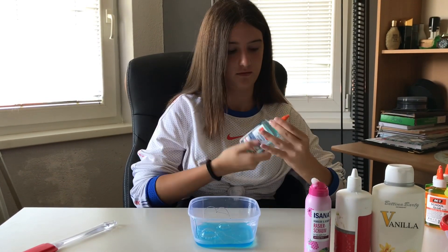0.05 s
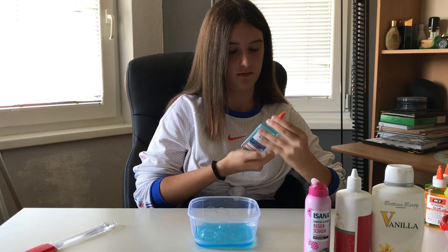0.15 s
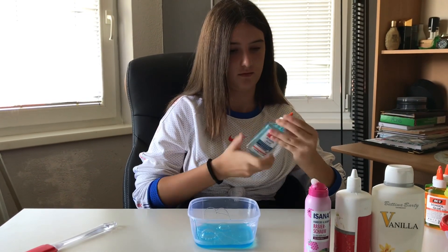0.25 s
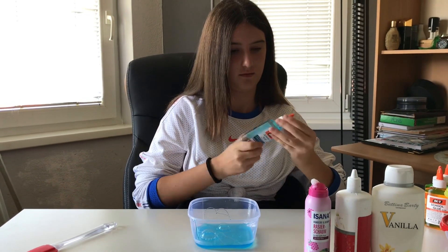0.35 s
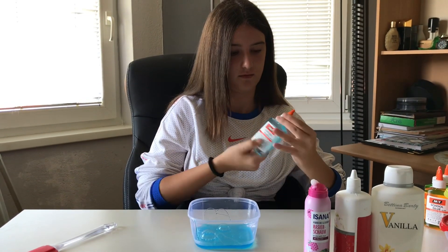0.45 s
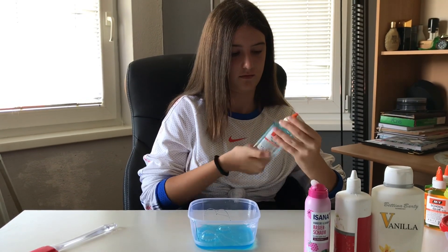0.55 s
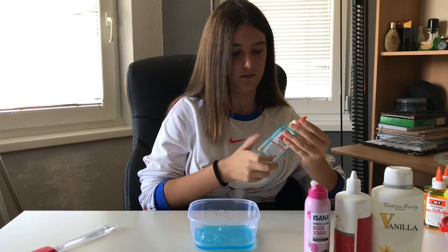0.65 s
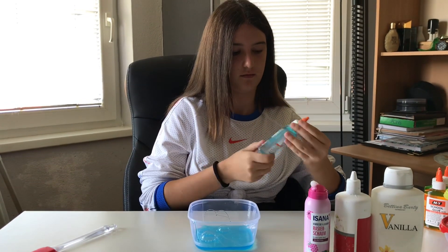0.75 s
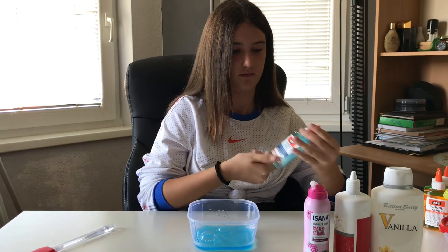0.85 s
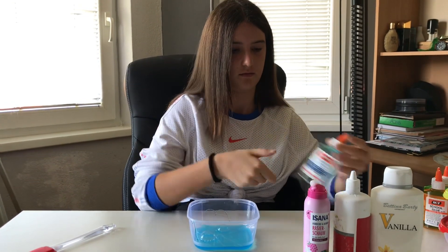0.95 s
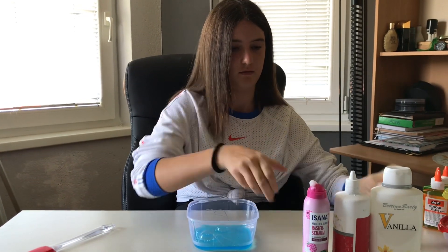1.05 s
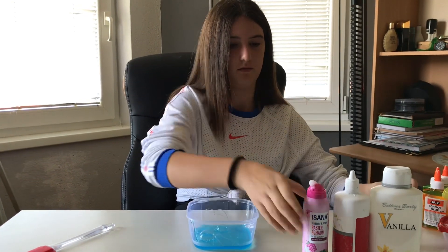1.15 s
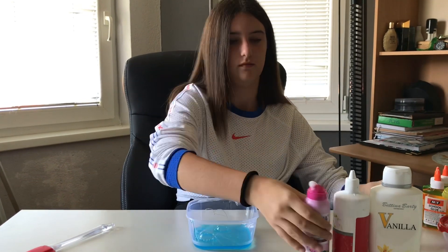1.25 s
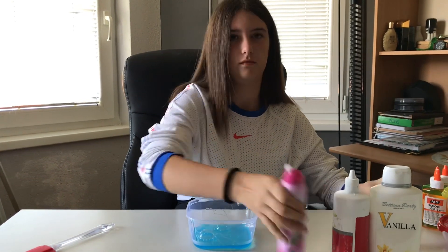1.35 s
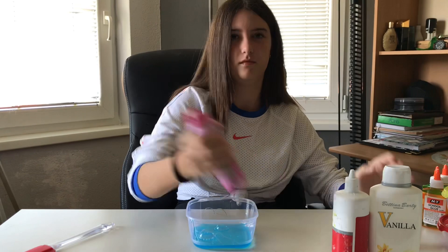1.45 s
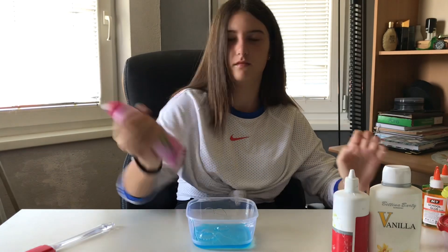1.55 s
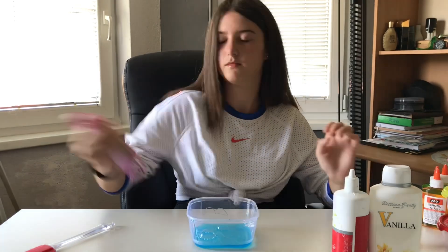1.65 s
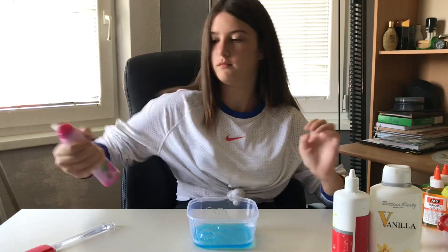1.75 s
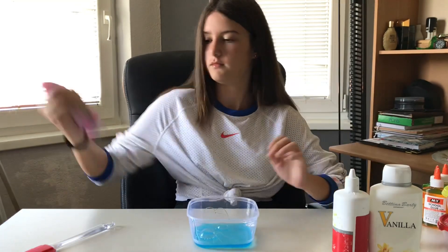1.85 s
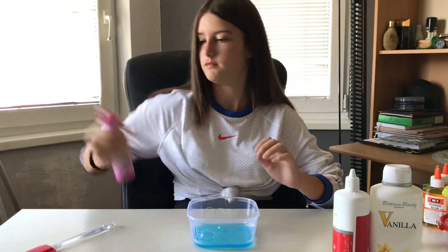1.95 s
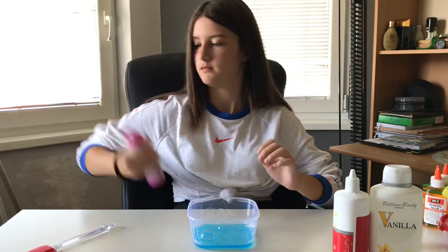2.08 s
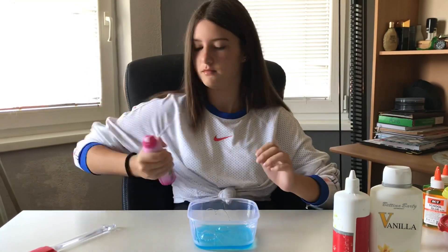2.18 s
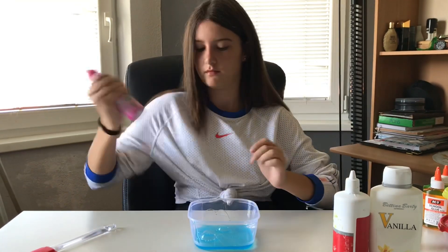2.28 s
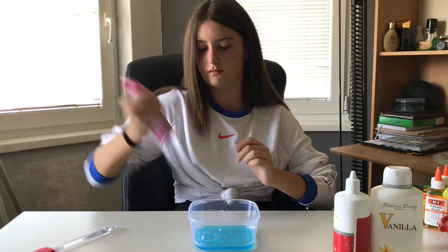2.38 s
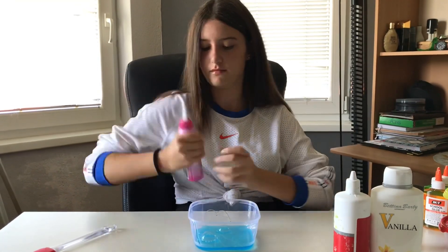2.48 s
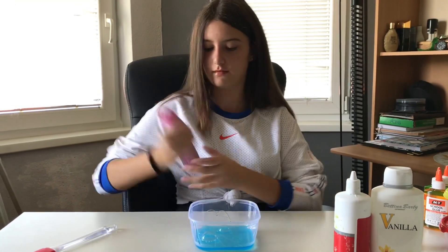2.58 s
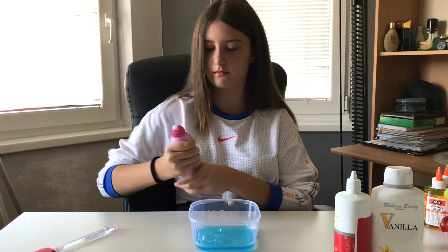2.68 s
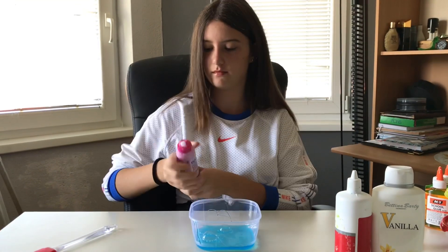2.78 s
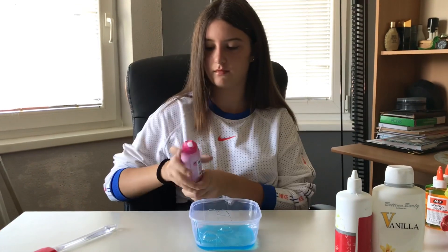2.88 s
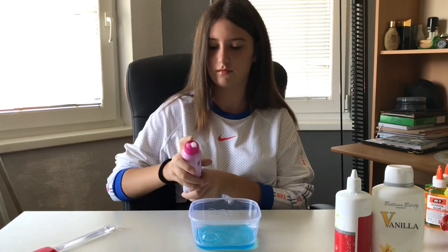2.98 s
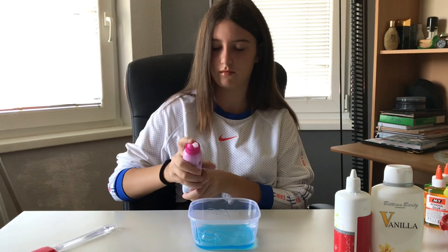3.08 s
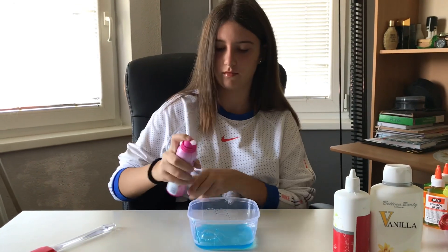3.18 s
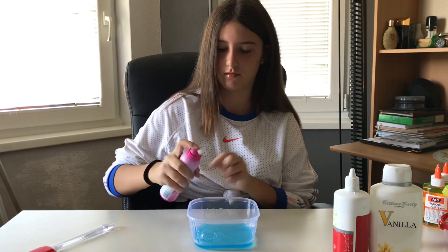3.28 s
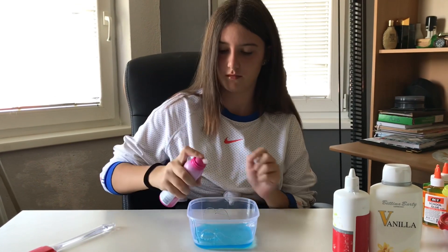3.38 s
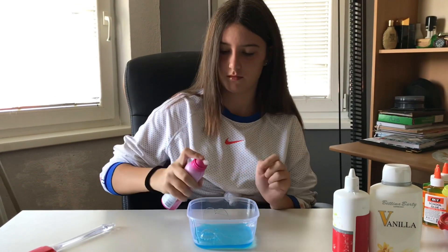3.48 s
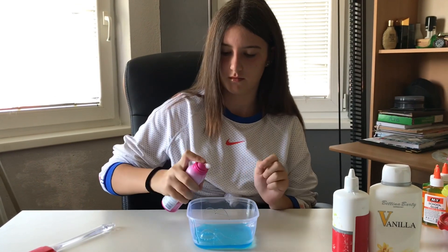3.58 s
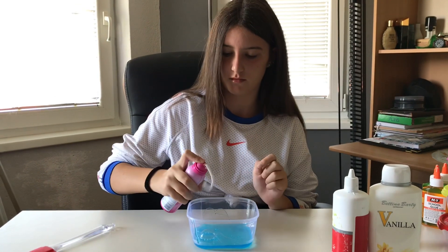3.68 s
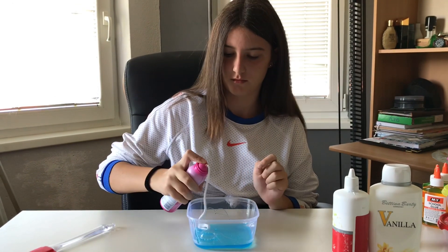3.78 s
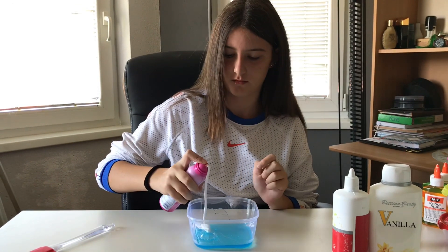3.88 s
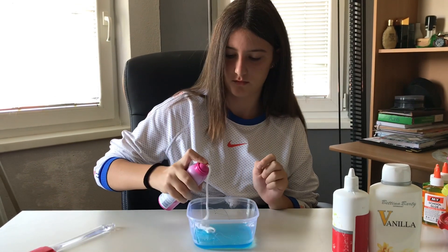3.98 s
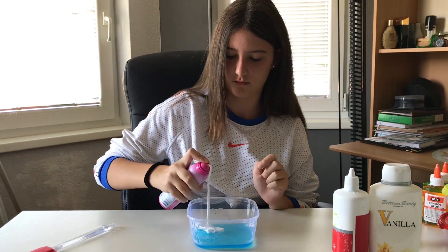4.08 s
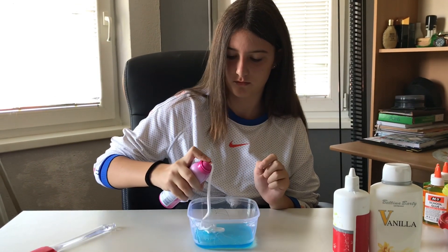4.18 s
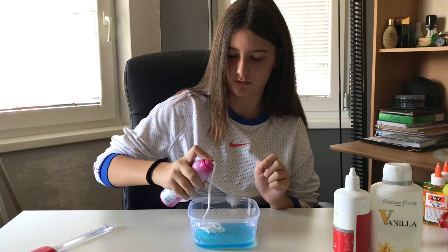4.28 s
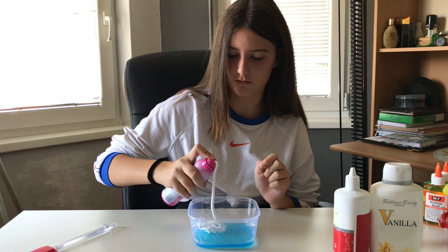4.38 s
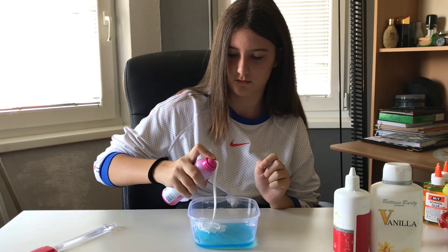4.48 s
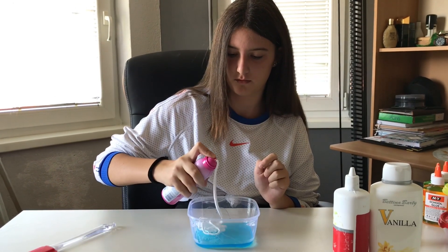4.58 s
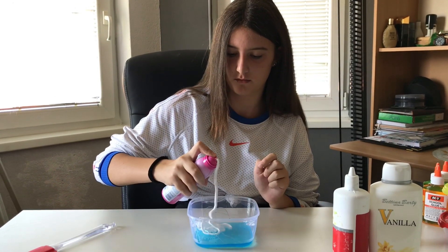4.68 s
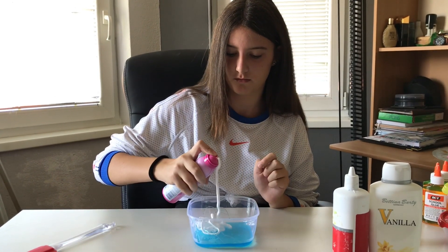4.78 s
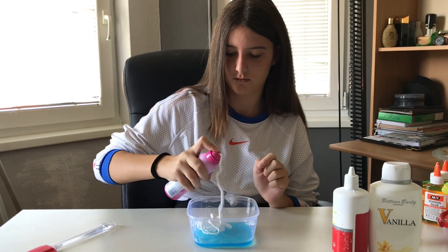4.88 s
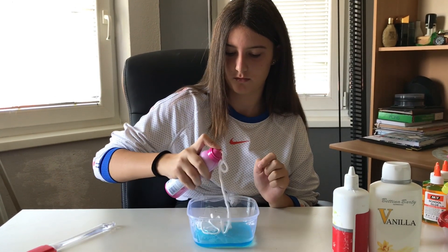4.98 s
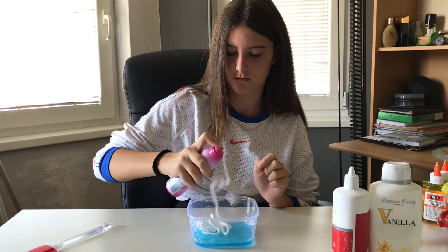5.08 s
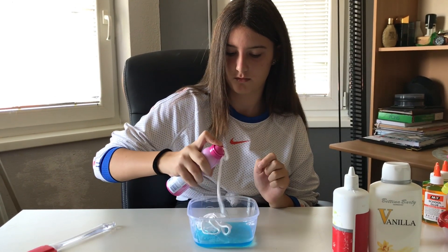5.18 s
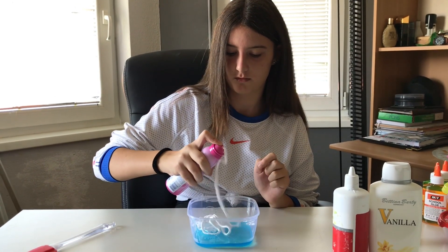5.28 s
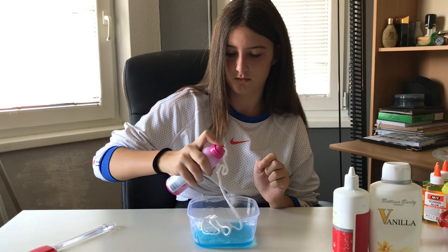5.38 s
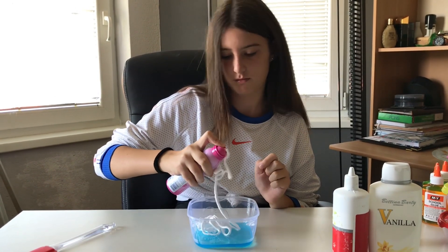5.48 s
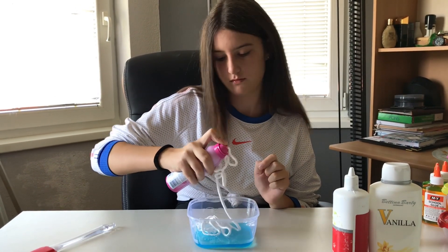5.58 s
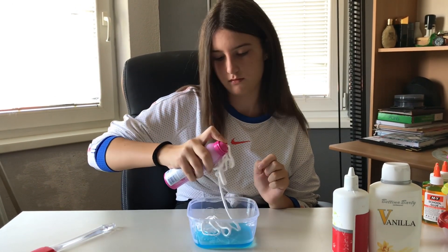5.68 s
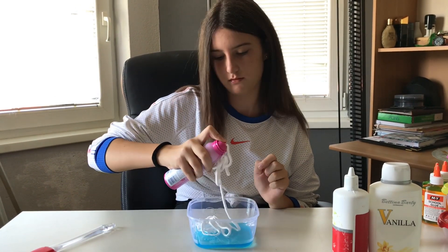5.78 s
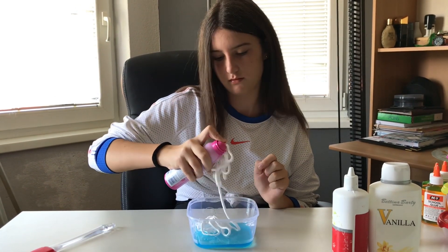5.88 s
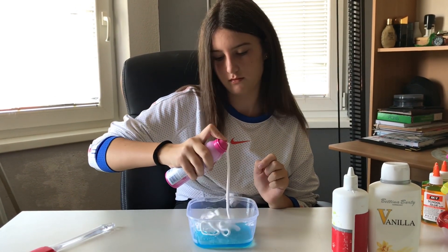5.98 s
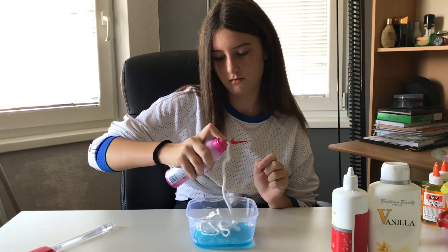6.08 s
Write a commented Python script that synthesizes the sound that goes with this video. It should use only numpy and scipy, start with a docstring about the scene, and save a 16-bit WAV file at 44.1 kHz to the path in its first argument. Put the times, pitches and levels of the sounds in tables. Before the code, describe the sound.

A plastic bottle is handled near the microphone in a small, quiet room, with a click at the start and faint finger taps through the first second. It knocks sharply on a table at about 1.2 and 1.3 seconds, rocks briefly, then lands with the loudest, hollow knock at 1.7 seconds. It wobbles in quickening, fading taps until 2.3 seconds. Overlapping this, a can of foam is shaken in rapid, soft liquid swishes until about 2.8 seconds, with faint sleeve rustling that carries into a short lull. At 3.6 seconds the valve spits a brief high hiss with tiny clicks and a wet sputter. It clicks open at 4.1 seconds, and foam runs out in a quiet, steady, airy hiss. From 5 seconds, tiny crackles and bubble pops join the hiss, which continues to the end at about 6 seconds.

```python
"""Plastic bottle and can of foam

In a small quiet room a plastic bottle is handled, knocked down on a table and left wobbling:
each impact excites the damped modes of bottle wall and table top. A can of foam is shaken, its
liquid swishing at every stroke. The valve spits, dribbles and clicks open; then turbulent gas
and tiny bursting bubbles drive the resonances of the spout as a string of foam hisses out."""
import sys
import numpy as np
from scipy import signal
from scipy.fft import rfft, irfft
from scipy.io import wavfile

SR = 44100
rng = np.random.default_rng(int(sys.argv[2]) if len(sys.argv) > 2 else 0)


def to_wav(sig):
    """Store sig (one row per channel, or 1-D mono) as 16-bit WAV at the path in sys.argv[1].

    Samples outside -1..1 are clipped; the rate is SR.
    """
    pcm = np.clip(np.atleast_2d(sig), -1, 1) * 32767
    pcm = np.round(pcm).astype(np.int16)
    wavfile.write(sys.argv[1], SR, pcm.T)  # frames by channels


N = 270774
TIME = np.arange(N) / SR


def amp(db):
    """Amplitude ratio of a level in decibels."""
    return 10 ** (np.asarray(db) / 20)


def unit(x):
    """Normalisation to unit rms."""
    return x / np.sqrt(np.mean(x ** 2) + 1e-30)


def curve(rows, column=1):
    """Linear interpolation of a time table at every sample."""
    rows = np.array(rows)
    return np.interp(TIME, rows[:, 0], rows[:, column])


def spectrum_at(points, hz):
    """Interpolation of a spectrum on a log-frequency axis."""
    f, value = np.transpose(points)
    return np.interp(np.log(hz + 1), np.log(f + 1), value)


def swell(centre_s, half_s):
    """Gaussian envelope, down to 1/e at half_s from its centre."""
    return np.exp(-((TIME - centre_s) / half_s) ** 2)


def add(mix, start_s, sound):
    """Superposition of a sound on the mix, in place."""
    part = mix[max(round(start_s * SR), 0):][:len(sound)]
    part += sound[:len(part)]


def colour(x, points):
    """Spectral shaping, at unit rms."""
    gain = amp(spectrum_at(points, np.fft.rfftfreq(len(x), 1 / SR)))
    return unit(irfft(rfft(x) * gain, len(x)))


def band(x, hz, width_hz):
    """Steep band-pass filtering, at unit rms."""
    f = np.fft.rfftfreq(len(x), 1 / SR)
    return unit(irfft(rfft(x) / np.sqrt(1 + (2 * (f - hz) / width_hz) ** 4), len(x)))


def noise_band(hz, width_hz, size=N):
    """Band-limited Gaussian noise, at unit rms."""
    return band(rng.standard_normal(size), hz, width_hz)


def grains(per_s, spread_db):
    """Shot noise: a random train of impulses, a few of them large."""
    size = amp(spread_db * np.minimum(rng.exponential(1, N), 4))
    return unit(size * rng.choice([-1, 1], N) * (rng.random(N) < per_s / SR))


def flutter(rate_hz, depth_db):
    """Random amplitude modulation: a gain that wanders by depth_db rms."""
    return amp(depth_db * noise_band(0, 2 * rate_hz))


# reverberation time of the room: frequency_hz, t60_s
ROOM_DECAY = [(100, 0.83), (400, 0.38), (1700, 0.26), (5000, 0.25), (15000, 0.16)]
# early reflections from table and walls: delay_s, gain
ECHOES = [(.0019, 0.46), (.0048, 0.31), (.0066, -0.14), (.0165, 0.16), (0.0195, -0.079), (0.0231, 0.057),
          (.0285, 0.015), (.0385, 0.2)]

def room(x, wet_db, echo_db=0, build_s=0.003):
    """Convolution with direct sound, early reflections and a diffuse tail whose treble dies first."""
    count = SR // 20
    taps = np.zeros(SR)
    taps[np.arange(count) * 20 + rng.integers(0, 20, count)] = rng.choice([-1., 1.], count)
    hz, t, spectra = signal.stft(taps, SR, nperseg=256)
    decay = amp(-60 * t / spectrum_at(ROOM_DECAY, hz)[:, None])
    tail = signal.istft(spectra * decay, SR, nperseg=256)[1]
    tail *= 1 - np.exp(-(np.arange(len(tail)) / SR / build_s) ** 2)
    response = amp(wet_db) * tail / np.linalg.norm(tail)
    response[0] += 1
    for delay_s, gain in ECHOES:
        response[round(delay_s * SR)] += gain * amp(echo_db)
    return signal.fftconvolve(x, response)[:N]


# spectrum of the room's air: frequency_hz, gain_db
AIR_SPECTRUM = [(20, -32.5), (40, -5), (65, -3.5), (95, -6.5), (130, 0.5), (220, -1.5), (450, -3.5),
                (750, -10.5), (1500, -12.5), (3000, -19), (7000, -23), (15500, -28)]
# course of the low drone: time_s, level_db
DRONE_LEVELS = [(0, -70), (1.0, -74.5), (2.35, -66), (2.7, -72.5), (4.7, -70.5), (5.25, -74), (5.55, -65),
                (6.14, -62)]

def background(hum_hz=242, drift_hz=3.9, hum_end_s=1.5):
    """Ambient noise: broadband air, a narrowband drone and a faint wavering hum that soon fades."""
    air = amp(-66.5) * colour(rng.standard_normal(N), AIR_SPECTRUM)
    drone = amp(curve(DRONE_LEVELS)) * noise_band(hz=98, width_hz=16)
    fade = np.clip((hum_end_s - TIME) * 10, 0, 1)
    pitch_hz = hum_hz + drift_hz * noise_band(hz=0, width_hz=4)
    hum = fade * amp(-72) * unit(np.sin(2 * np.pi * np.cumsum(pitch_hz) / SR))
    return air + drone + hum * flutter(rate_hz=9, depth_db=1.5)


# spectrum of sliding cloth: frequency_hz, gain_db
CLOTH_SPECTRUM = [(200, -7), (500, 8), (1700, 1), (3500, 0.5), (5800, -0.5), (7500, -3.5), (9500, -2),
                  (15500, -10.5)]
# movements of sleeve or hand: centre_s, level_db, half_length_s, brightness_fraction
BRUSHES = [(0.05, -72.5, 0.57, 0.05), (0.187, -66.5, 0.016, 1), (0.548, -66, 0.026, 0.8),
           (1.03, -66, 0.054, 1), (1.554, -59.5, 0.035, 0.87), (1.815, -61, .12, 0.04),
           (2.894, -68, 0.046, 1), (3.141, -69, .28, 0), (3.236, -66.5, 0.038, 1)]

def rubbing(sleeve_db=-9.5, settle_s=0.064):
    """Stick-slip friction: the sleeve rustles with the shaking, and quick brushes sound brighter."""
    idle_s = abs(TIME - np.clip(TIME, SHAKE_START_S, SHAKE_END_S))
    slide = amp(curve(SHAKE_VIGOUR) + sleeve_db) * np.exp(-idle_s / settle_s)
    sweep = np.zeros(N)
    for centre_s, db, half_s, bright in BRUSHES:
        move = amp(db) * swell(centre_s, half_s)
        slide += (1 - bright) * move
        sweep += bright * move
    rustle = slide * colour(grains(per_s=7000, spread_db=1), CLOTH_SPECTRUM)
    rustle *= flutter(rate_hz=39.6, depth_db=1.8)
    return rustle + sweep * colour(grains(per_s=21000, spread_db=2.5), SWISH_SPECTRUM)


# spectrum of a hard contact: frequency_hz, gain_db
CONTACT_SPECTRUM = [(300, -19.5), (1500, -13), (3000, -0.5), (4000, -8), (5800, 3.5), (8000, -5),
                    (11000, -9), (15500, -10.5)]

def snap():
    """Impulsive contact: two hard surfaces meet in a broadband pulse."""
    pulse = colour(signal.unit_impulse(512, 8), CONTACT_SPECTRUM)
    return 3 * pulse / np.linalg.norm(pulse)


def scrape(decay_s, size=2048):
    """Friction noise: the surfaces grate briefly after they meet."""
    return colour(rng.standard_normal(size), CONTACT_SPECTRUM) * np.exp(-np.arange(size) / SR / decay_s)


def clack(hz, cycles):
    """Heavily damped oscillation whose envelope peaks after the given number of cycles."""
    turns = np.arange(2048) * hz / SR
    return turns / cycles * np.exp(1 - turns / cycles) * np.sin(2 * np.pi * turns)


def fingertips(count=7, start_s=0.41, end_s=0.94, body_db=-66, body_hz=1830, snap_db=-59):
    """Light impacts at uneven moments as the bottle is turned, as rows like those of CLICKS."""
    slots = (np.arange(count) + rng.random(count)) / count
    return [(start_s + slot * (end_s - start_s), body_db - softer_db, body_hz, snap_db - softer_db)
            for slot, softer_db in zip(slots, rng.standard_normal(count))]


# clicks of fingers, cap and valve, and the bright tick of the bottle's second knock:
# start_s, body_db, body_hz, snap_db
CLICKS = [(0.0726, -37, 1900, -44), (0.078, -45, 1570, -65), (.245, -55, 880, -59),
          (0.514, -49.5, 1870, -62), (1.330, -36, 13370, -59), (2.439, -54, 2770, -48),
          (3.639, -62, 4000, -43), (3.662, -67, 4000, -49.5), (4.0787, -51.5, 547, -42),
          (4.087, -46.5, 1250, -48)]

def clicks():
    """Small impacts on plastic: each is a damped body resonance, a contact pulse and brief friction."""
    sharp, grating = np.zeros((2, N))
    for start_s, body_db, body_hz, snap_db in CLICKS + fingertips():
        add(sharp, start_s, amp(body_db) * clack(body_hz, cycles=0.4))
        add(sharp, start_s, amp(snap_db) * snap())
        add(grating, start_s, amp(snap_db - 13) * scrape(decay_s=0.01))
    return room(sharp, wet_db=0) + grating


def wobble(start_s=1.74, end_s=2.3, first_gap_s=0.07, last_gap_s=0.026, pitch_hz=413):
    """Damped rocking: as the bottle loses energy, its edges tap faster and more softly."""
    taps = np.zeros(N)
    now_s, gap_s = start_s, first_gap_s
    for late, strong, high in rng.uniform(-1, 1, (40, 3)):
        # taps weaken by 14 dB a second and by 10.5 dB per halving of the gap
        db = -36.5 - 14 * (now_s - start_s) + 10.5 * np.log2(gap_s / first_gap_s)
        tap = clack(pitch_hz * 2 ** (0.23 * high), cycles=0.71)  # no two land on the same spot
        if now_s < end_s:
            add(taps, now_s, amp(db + 2 * strong) * tap)
        now_s += gap_s * (1 + 0.2 * late)
        gap_s = last_gap_s + (gap_s - last_gap_s) * 0.62
    return room(taps, wet_db=0)


def ring(modes):
    """Free vibration: a sum of decaying modes, neighbours in opposite phase."""
    t = np.arange(32768) / SR
    hz, db, t60_s = np.transpose(modes)[:, :, None]
    polarity = (-1) ** np.arange(len(modes))[:, None]
    partials = polarity * amp(db - 60 * t / t60_s) * np.sin(2 * np.pi * hz * t)
    return partials.sum(axis=0) / np.sqrt(np.sum(amp(db) ** 2)) / 2


# modes of the table top: pitch_hz, gain_db
TABLE_MODES = [(135, -15.5), (180, -6), (209, -7), (255, -9), (316, 4), (384, -1), (434, -1.5), (486, 0),
               (574, -1), (662, -5.5), (716, -5), (790, -1), (878, -1.5), (931, -7.5)]

def thud(low_hz, high_hz, t60_s=0.19):
    """Struck plate: a short push and its modes; weight sets the low band edge, hardness the high."""
    plate = ring([(hz, db, t60_s) for hz, db in TABLE_MODES])
    add(plate, 0, 0.84 * clack(hz=700, cycles=0.47))
    add(plate, 0, 0.1 * clack(hz=95, cycles=0.5))
    return signal.sosfilt(signal.butter(3, [low_hz, high_hz], "band", fs=SR, output="sos"), plate)


# modes of the bottle's wall: pitch_hz, gain_db, t60_s
BOTTLE_MODES = [(1100, -17, 0.25), (1177, -12.5, .22), (1174, -6, .22), (1353, -5.5, 0.28),
                (1411, -7.5, 0.24), (1542, -2, 0.27), (1620, -5, .18), (1680, -6.5, 0.11), (1780, -2, 0.15),
                (1894, -3, .2), (2036, -5, 0.14), (2187, -10, 0.31), (2490, -9, 0.15), (2718, -9.5, .2),
                (2985, -11.5, 0.35), (3320, -10.5, 0.11), (5040, -10.5, 0.24), (6300, -10.5, 0.1399)]

def bottle_wall(clack_hz):
    """Wall ring: each knock rings most strongly the wall modes nearest its clack's pitch."""
    return ring([(hz, db - 14 * min(abs(np.log2(hz / clack_hz)), 1), t60_s)
                 for hz, db, t60_s in BOTTLE_MODES])


# blows on the table:
# start_s, thud_db, low_hz, high_hz, clack_db, clack_hz, wall_db, snap_db, rebound_db
KNOCKS = [(1.183, -18.5, 135, 1189, -24, 2117, -27.5, -27.5, -7.5),
          (1.3340, -23.5, 347, 1178, -28.5, 1150, -38, -49.5, -16.5),
          (1.6884, -16, 100, 850, -8, 1680, -19, -21, -22.5)]
# the bottle rocking on its base between blows: start_s, thud_db
ROCKS = [(1.4585, -35), (1.541, -37.5), (1.6060, -36.5), (1.6710, -39)]

def contacts(rebound_s=0.0337, dull_db=-8.5):
    """Inelastic collisions: each blow, its weaker and duller rebound, and the rocking in between."""
    for start_s, thud_db, low_hz, high_hz, clack_db, clack_hz, wall_db, snap_db, rebound_db in KNOCKS:
        yield start_s, thud_db, low_hz, high_hz, clack_db, clack_hz, wall_db, snap_db
        clatter_db = rebound_db + dull_db
        yield (start_s + rebound_s, thud_db + rebound_db, low_hz, high_hz,
               clack_db + clatter_db, clack_hz, wall_db + clatter_db, snap_db + clatter_db)
    for start_s, db in ROCKS:
        yield start_s, db, 280, 900, db - 9, 2130, db - 25, db - 16.5


def knocks(boom_hz=208, boom_t60_s=0.7):
    """Impact excitation: each contact snaps, clacks the shell and sets bottle and table ringing."""
    sharp, wall, table = np.zeros((3, N))
    for start_s, thud_db, low_hz, high_hz, clack_db, clack_hz, wall_db, snap_db in contacts():
        add(sharp, start_s, amp(snap_db) * snap())
        add(sharp, start_s + 0.0012, amp(snap_db - 5.5) * snap())  # the base's far edge lands next
        add(wall, start_s, amp(snap_db - 8) * scrape(decay_s=0.0026))
        add(sharp, start_s + 0.0003, amp(clack_db) * clack(clack_hz, cycles=0.73))
        add(wall, start_s, amp(wall_db) * bottle_wall(clack_hz))
        add(table, start_s + 0.0013, amp(thud_db) * thud(low_hz, high_hz))
    boom = room(table, wet_db=-15, echo_db=-5)
    # a low room mode lingers after the last, heaviest blow
    add(boom, KNOCKS[-1][0], amp(-35) * ring([(boom_hz, 0, boom_t60_s)]))
    return room(sharp, wet_db=-0.5) + wall + boom


SHAKE_START_S, SHAKE_END_S = 1.456, 2.76
# spectrum of a swish: frequency_hz, gain_db
SWISH_SPECTRUM = [(250, -24.5), (600, -11), (1500, -0.5), (3000, 5), (4200, -4.5), (6000, 3.5), (9000, 3),
                  (12000, -1.5), (15500, 1)]
# the two ends of the can: swish_gain_db, slosh_gain_db, slosh_hz
CAN_ENDS = [(0, -2.5, 2930), (-2.5, 0, 2500)]
# vigour of the shaking: time_s, swish_gain_db, slosh_re_swish_db
SHAKE_VIGOUR = [(1.45, -68, -2), (1.6, -66, -6), (1.87, -53.5, -5), (2.08, -52, -24), (2.16, -49, -1.5),
                (2.23, -50, -13), (2.37, -51, -5), (2.58, -51.5, -8), (2.73, -56.5, -5)]

def shaking(stroke_s=0.0703, rise_s=0.008, fall_s=0.016):
    """Forced sloshing: liquid hits each end of the can in turn, with a frothy swish and hollow slosh."""
    froth = colour(grains(per_s=12000, spread_db=4.5), SWISH_SPECTRUM)
    strokes = np.zeros(N)
    t = np.arange(8192) / SR - 0.05  # time from the liquid's impact
    surge = np.exp(-np.maximum(-t - 0.003, 0) / rise_s - np.maximum(t - 0.008, 0) / fall_s)
    vigour_db, slosh_db = curve(SHAKE_VIGOUR), curve(SHAKE_VIGOUR, column=2)
    for k, hit_s in enumerate(np.arange(SHAKE_START_S, SHAKE_END_S, stroke_s)):
        at = round(hit_s * SR)
        end_swish_db, end_slosh_db, slosh_hz = CAN_ENDS[k % 2]
        swish = amp(end_swish_db) * froth[at:][:len(t)]
        slosh = amp(slosh_db[at] + end_slosh_db) * noise_band(slosh_hz, width_hz=900, size=len(t))
        add(strokes, hit_s + t[0], amp(vigour_db[at]) * surge * (swish + slosh))
    return amp(-1) * room(strokes, wet_db=-3.5, echo_db=-11)


WET_S, WET_HALF_S = 3.7, 0.045  # liquid reaches the spout
# spectrum of escaping gas: frequency_hz, gain_db
GAS_SPECTRUM = [(300, -11), (1200, -9), (3000, -16), (4200, -6), (5400, -2.5), (7200, -10), (8300, 0),
                (9700, -4), (10200, 2.5), (11700, -9), (13000, 0), (14200, -2), (15600, -4.5)]
# spectrum of sputtering drops: frequency_hz, gain_db
SPUTTER_SPECTRUM = [(200, -12.5), (500, 4), (1300, 2.5), (2800, -4), (5500, -13), (9000, -1), (15500, -13)]

def spit(start_s=3.574, attack_s=0.011, hold_s=0.19, release_s=0.068, thin_hz=9900, widen_s=0.053):
    """Turbulent jet: gas trapped in the valve escapes, then sputters lower as liquid arrives."""
    gas = colour(rng.standard_normal(N), GAS_SPECTRUM) * flutter(rate_hz=160, depth_db=3.5)
    drops = colour(grains(per_s=5000, spread_db=3), SPUTTER_SPECTRUM)
    t = np.maximum(TIME - start_s, 0)
    # a barely open valve hisses only above thin_hz; the rest comes in as it widens
    lower = signal.sosfiltfilt(signal.butter(4, thin_hz, fs=SR, output="sos"), gas)
    jet = gas - lower + amp(-1) * np.minimum(t / widen_s, 1) * lower
    valve = np.minimum(t / attack_s, 1) * np.exp(-np.maximum(t - hold_s, 0) / release_s)
    pressure = amp(-53 - 59 * t)  # falls as the valve empties
    return valve * pressure * jet + amp(-64) * swell(WET_S, WET_HALF_S) * drops


def bubble_pop():
    """Film rupture: one large bubble at the spout releases a short, high puff of air."""
    return amp(-49) * swell(centre_s=5.556, half_s=0.0035) * noise_band(hz=7200, width_hz=2100)


# foam flow through the open valve: time_s, gain_db
FLOW_GAINS = [(4.14, -68), (4.172, -72), (4.184, -63.5), (4.58, -62.5), (4.988, -67.5), (5.06, -64),
              (5.38, -67.5), (6.12, -63.5)]

def flow(open_s=4.08, rise_s=0.042):
    """Flow sets amplitude: foam dribbles, seeps, then runs steadily once the valve is open."""
    opened = np.clip((TIME - open_s) / rise_s, 0, 1)
    seep = amp(-61.5) * swell(WET_S, WET_HALF_S) + amp(-75) * (TIME > WET_S)
    return (1 - opened) * seep + opened * amp(curve(FLOW_GAINS) + 3.5)


# spout resonances with a straight or a curled string of foam: pitch_hz, width_hz, straight_db, curled_db
SPOUT_RESONANCES = [(1300, 490, -7.5, -7), (1880, 310, -2.5, -0.5), (2370, 360, 4, 3),
                    (3040, 920, -6.5, -3.5), (4810, 430, -3, -5.5), (5490, 640, 0, -4.5),
                    (6490, 710, -1.5, -6), (7400, 820, -23, -6), (8075, 660, 0, -2), (8830, 440, -3.5, -7),
                    (9640, 600, -3, -11), (10450, 300, 5.5, -5), (10740, 380, -3, 2),
                    (11550, 880, -7.5, -6.5), (12900, 1000, 0, -0.5), (14200, 800, -2, -2),
                    (14920, 810, -1.5, -2)]

def foam(curl_s=5.0, curl_half_s=0.07):
    """Source and filter: gas and bursting bubbles drive the spout; its colour shifts as the foam curls."""
    jet = rng.standard_normal(N) * flutter(rate_hz=70, depth_db=2.04)
    crackle_db = -13 + 9 * swell(centre_s=5.78, half_s=0.53)  # louder as foam piles up on the spout
    drive = jet + amp(crackle_db) * grains(per_s=700, spread_db=7)
    curl = np.interp(TIME, [curl_s - curl_half_s, curl_s + curl_half_s], [0.31, 0.81])  # 1: fully curled
    power = np.zeros((2, N // 2 + 1))
    f = np.fft.rfftfreq(N, 1 / SR)
    for hz, width_hz, straight_db, curled_db in SPOUT_RESONANCES:
        power += amp([[straight_db], [curled_db]]) ** 2 / (1 + (2 * (f - hz) / width_hz) ** 4)
    power += amp(-15) ** 2 * (f > 300)  # broad hiss between the resonances
    straight, curled = irfft(rfft(drive) * np.sqrt(power), N)
    hiss = unit((1 - curl) * straight + curl * curled)
    # folds of the curled string burst in small high pops
    pops = amp(-10) * curl * band(grains(per_s=49, spread_db=4), hz=7450, width_hz=2900)
    return flow() * unit(room(hiss + pops, wet_db=-2, echo_db=-25))


def scene():
    """Linear superposition of all sources in one channel."""
    handling = knocks() + wobble() + clicks() + shaking() + rubbing()
    spray = spit() + foam() + bubble_pop()
    return (handling + spray + background())[None]


def record(dry, low_hz=45, high_hz=15780):
    """Band limiting: the microphone sheds deep bass, and a steep low-pass cuts the highest treble."""
    bass_cut = signal.sosfilt(signal.butter(3, low_hz, "high", fs=SR, output="sos"), dry)
    low_pass = signal.firwin(511, high_hz, window=("kaiser", 9), fs=SR)
    return signal.oaconvolve(bass_cut, low_pass[None], "same")


dry = scene()
out = record(dry)
to_wav(out)
```